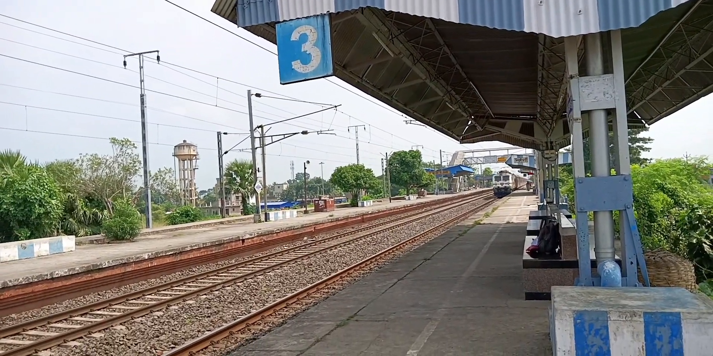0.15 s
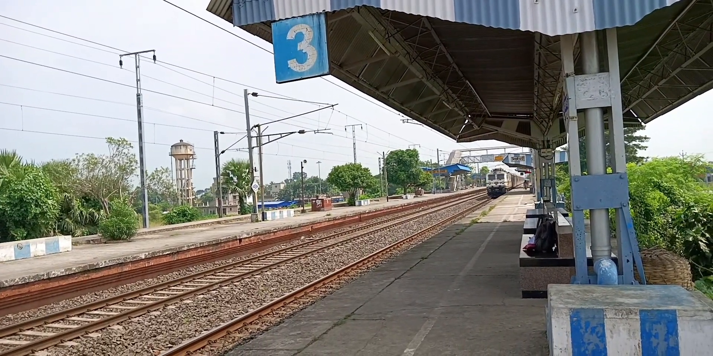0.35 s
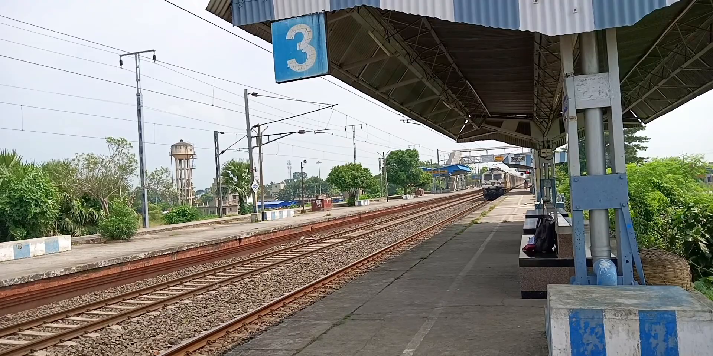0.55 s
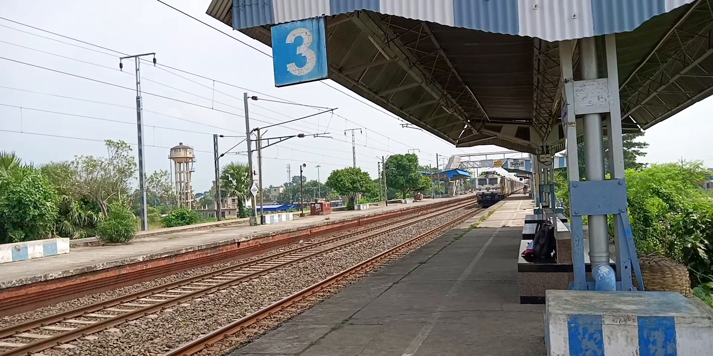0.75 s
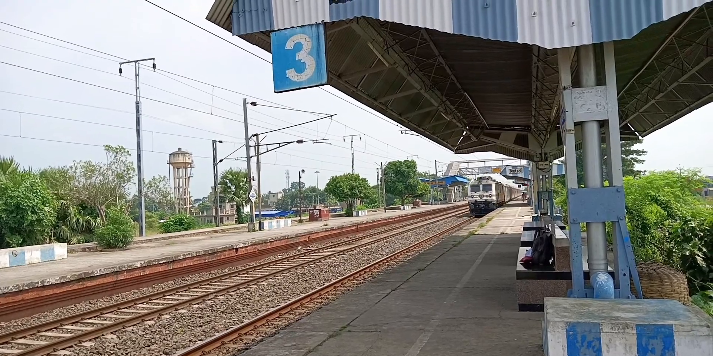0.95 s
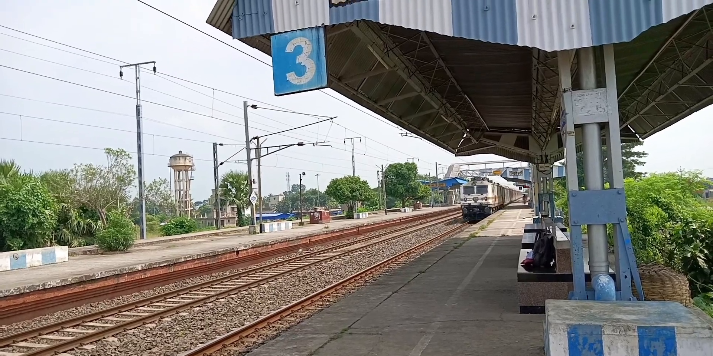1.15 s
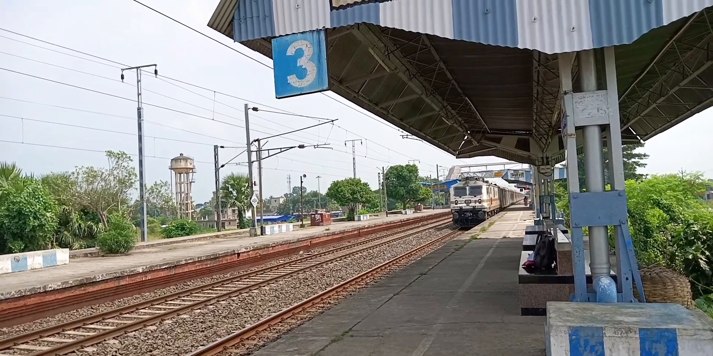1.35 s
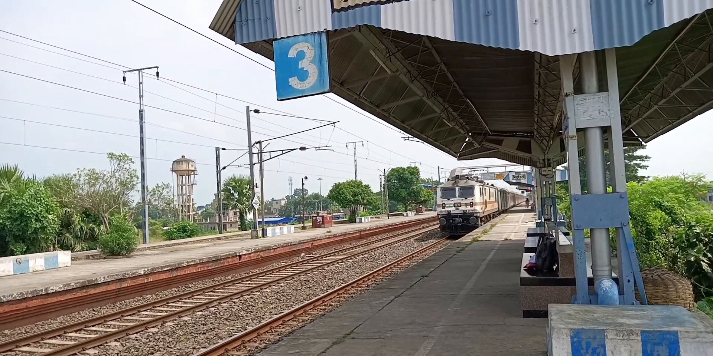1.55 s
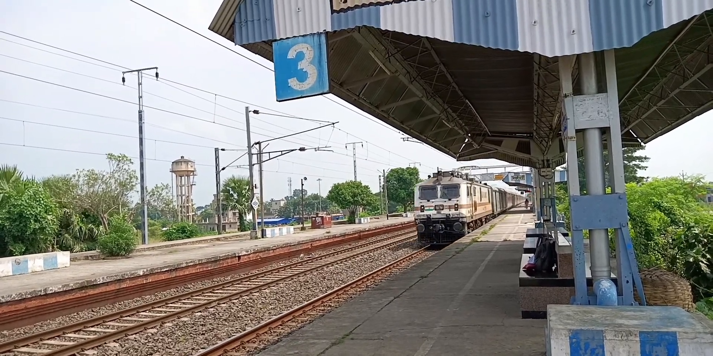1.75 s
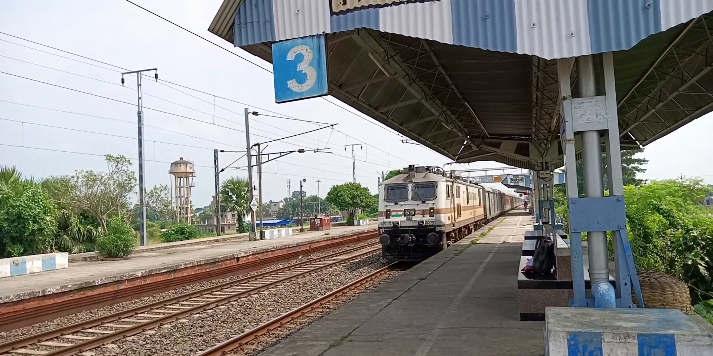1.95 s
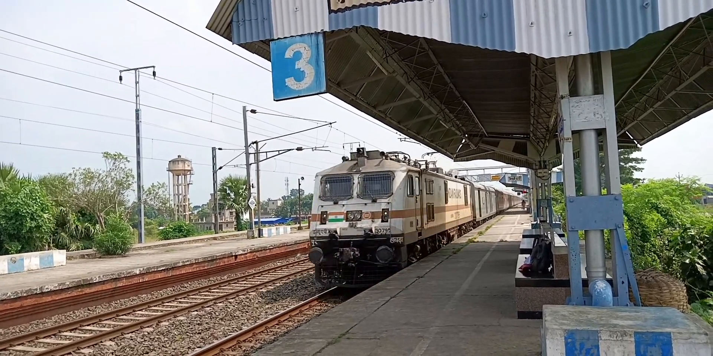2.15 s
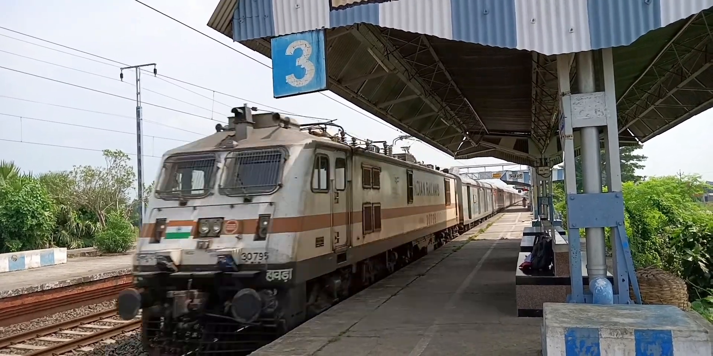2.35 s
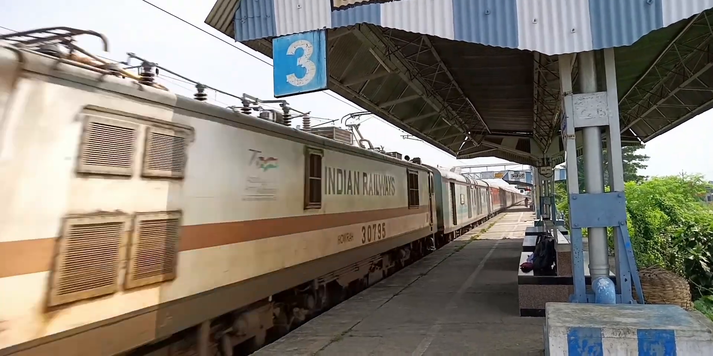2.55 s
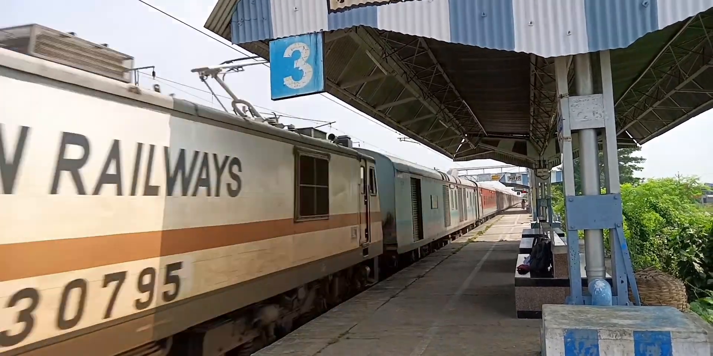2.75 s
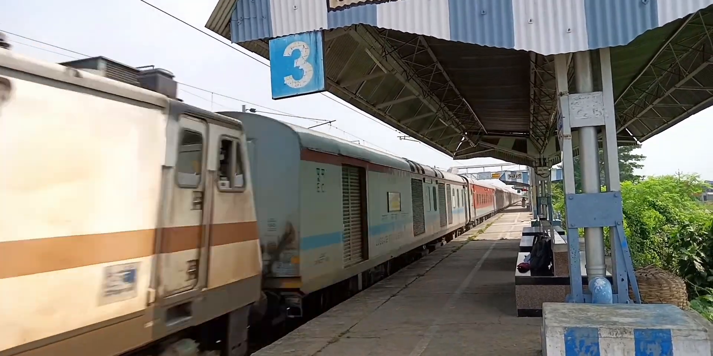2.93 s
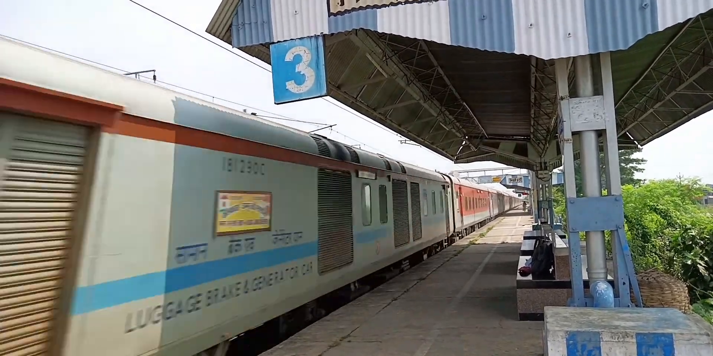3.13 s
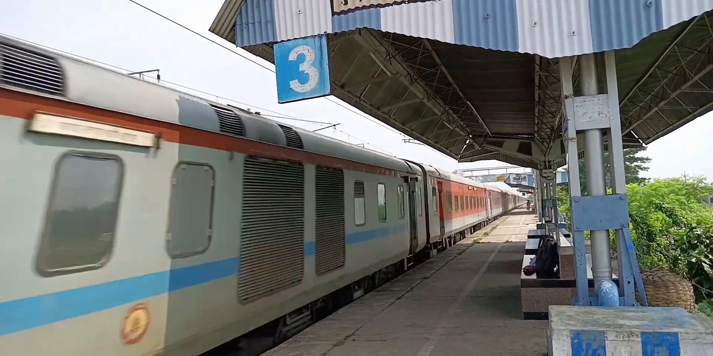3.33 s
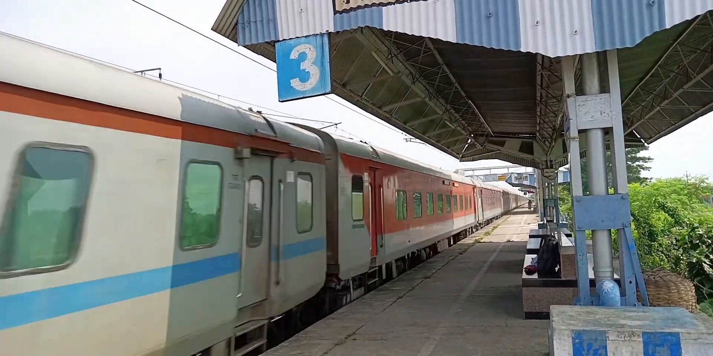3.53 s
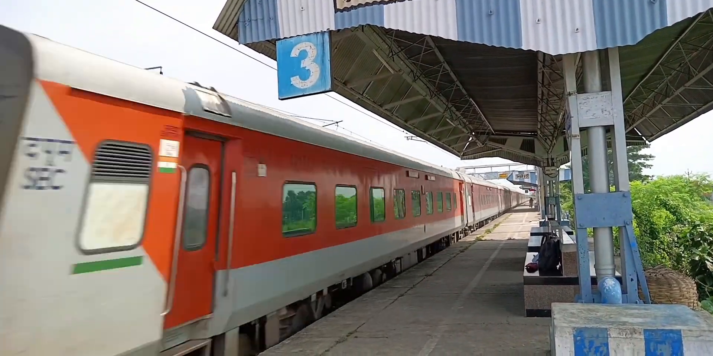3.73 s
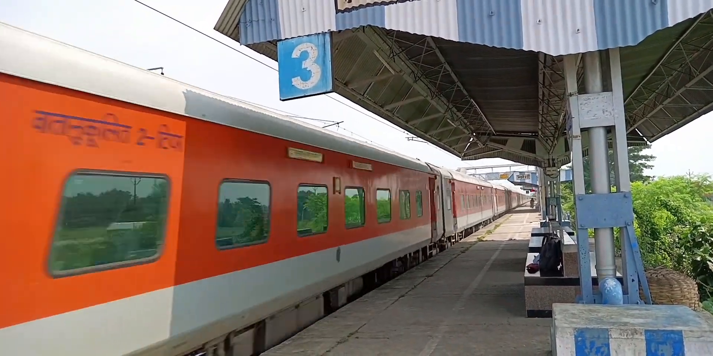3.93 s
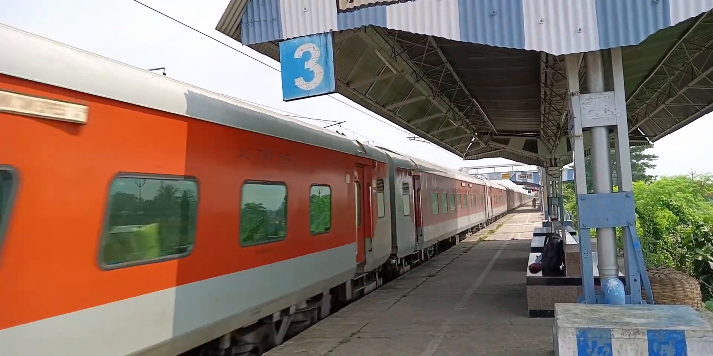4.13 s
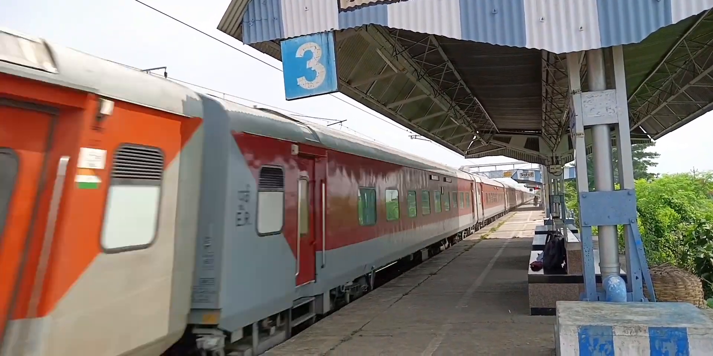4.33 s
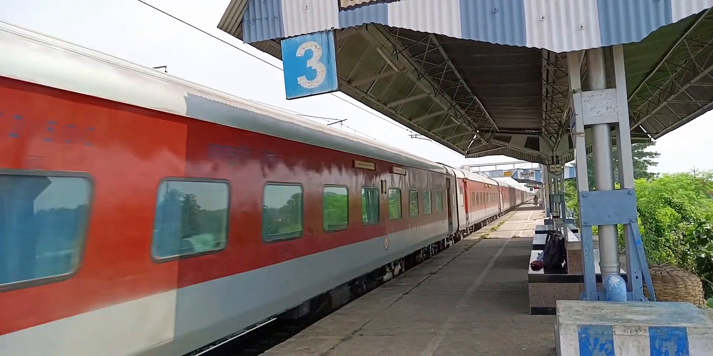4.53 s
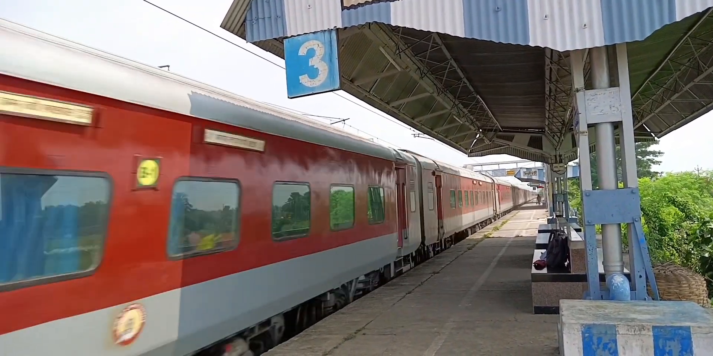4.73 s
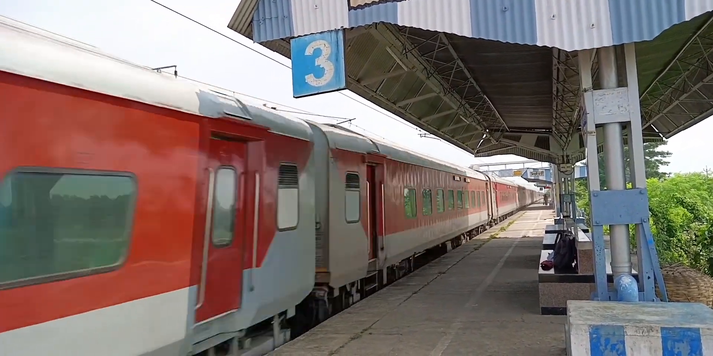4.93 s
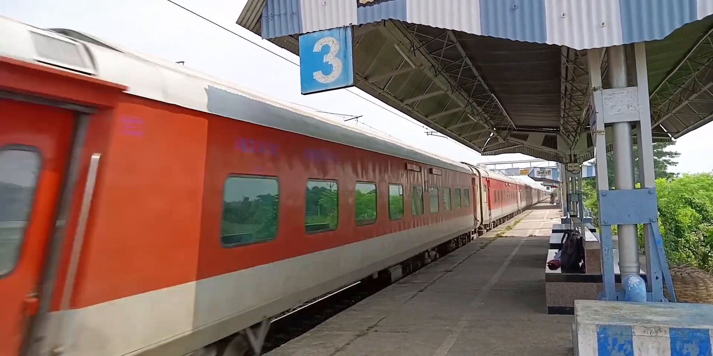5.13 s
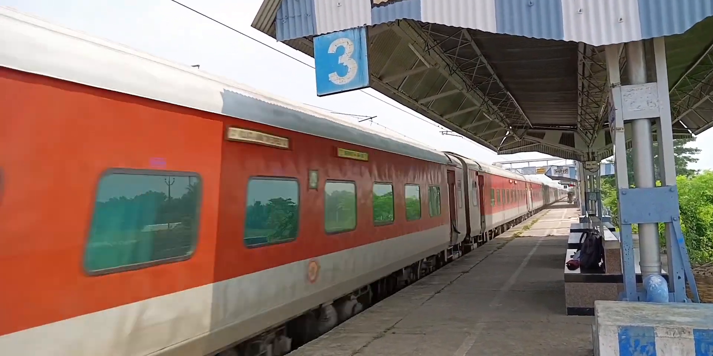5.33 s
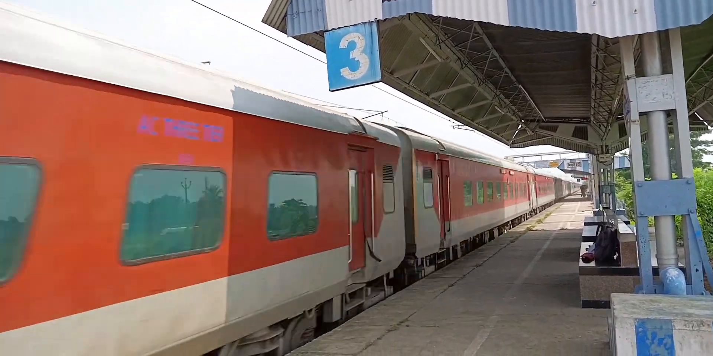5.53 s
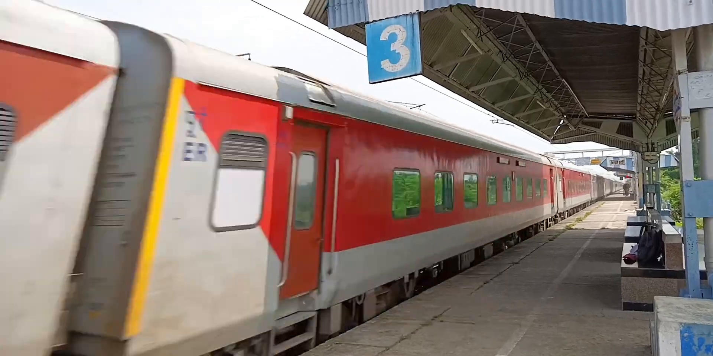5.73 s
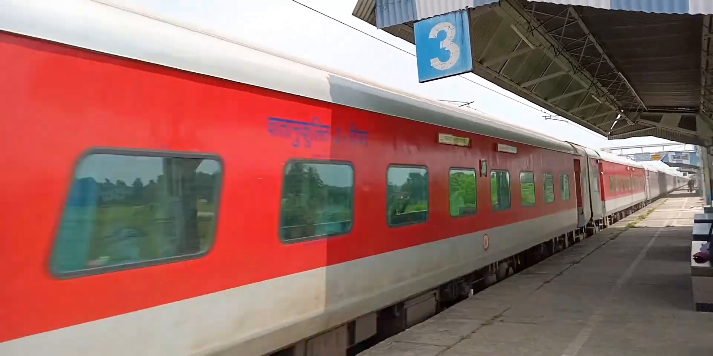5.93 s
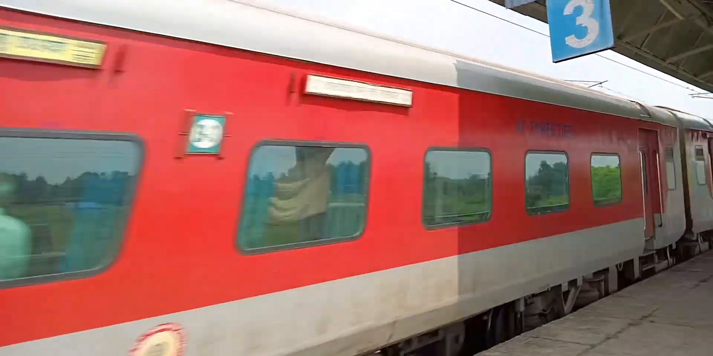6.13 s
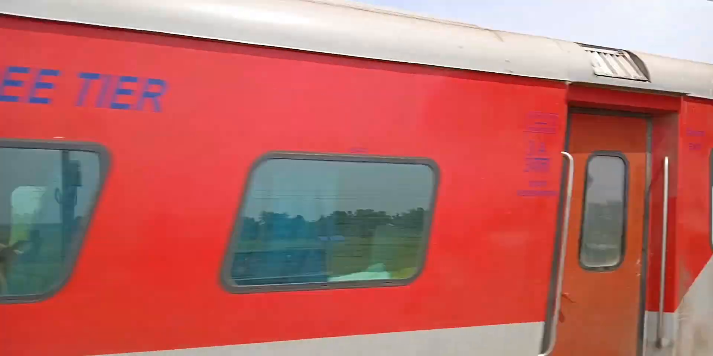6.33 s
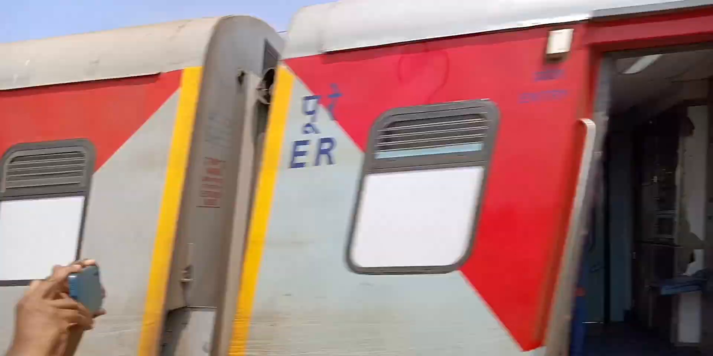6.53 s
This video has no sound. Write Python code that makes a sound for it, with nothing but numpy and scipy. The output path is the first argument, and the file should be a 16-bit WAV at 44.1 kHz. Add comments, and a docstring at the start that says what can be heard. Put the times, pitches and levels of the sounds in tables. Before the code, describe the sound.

From 0 s the rails sing on an open-air platform: a wavering metallic ring around 700 to 1000 Hz, growing over distant rolling. Five faint bird chirps, thin whistles falling at the end, come between 0.3 and 1.05 s. At 1.45 s a brassy single air horn starts, dipping the rail sound beneath it; its tones waver with echoes and short rasps, with a low thump near 2.45 s. The pitch slides down as the locomotive passes around 2.65 s, and the horn stops at 2.76 s. Motor whine, squeals and a big burst of wheel roar peak around 2.7 to 3.1 s. Coaches then rush by very close in throbbing surges of ringing, drone and hiss. Flat wheels hammer about twelve times a second from 3.8 to 4.6 s, with brief squeals, and again sparsely at 5.1 to 5.4 s. Roar ebbs, then swells again, with one blow at 6.55 s, and is still passing at the end.

```python
"""Singing rails and a few bird chirps come first; then a horn drops in pitch as an express train passes close by.
Resonant noise sings in the rails; whistles, whine and horn are tones with pitch glides and blurred echoes.
Swells of roar mix coloured noise and ringing wheel modes, over a steadier bed from the rest of the train.
Flat spots hammer in runs of struck noise; brief high tones and short low thumps come during the horn and the pass."""
import sys
import numpy as np
from scipy import signal
from scipy.fft import rfft, irfft, next_fast_len
from scipy.io import wavfile
from scipy.ndimage import uniform_filter1d, minimum_filter1d

SR = 44100
rng = np.random.default_rng(int(sys.argv[2]) if len(sys.argv) > 2 else 0)


def bounce(signal):
    """Save signal as a 16-bit WAV file at the path given by the first command-line argument."""
    frames = np.transpose(np.atleast_2d(signal))
    limited = np.clip(frames, -1, 1)
    pcm = np.round(limited * 32767).astype(np.int16)
    wavfile.write(sys.argv[1], SR, pcm)


N = 290178

SOUND_M_PER_S, SPEED_M_PER_S, TRACK_DISTANCE_M = 343, 33.5, 4.5


def from_db(db):
    """Decibels to gain."""
    return np.exp(np.asarray(db) * (np.log(10) / 20))


def rms_one(x):
    """Scale to unit power."""
    return x / np.sqrt(np.mean(np.abs(x) ** 2) + 1e-20)


def seconds():
    """Time of every sample."""
    return np.arange(N) / SR


def in_time(rows):
    """Each level column of a table, joined by straight lines over time."""
    s, *columns = np.transpose(rows)
    return [np.interp(seconds(), s, c) for c in columns]


def drift(rate_hz):
    """Slow random wander of spread 1, drawn on a coarse time grid."""
    size = 16384
    hz = np.arange(size // 2 + 1) * SR / N
    spectrum = rfft(rng.standard_normal(size))
    slow = irfft(spectrum / (1 + (hz / rate_hz) ** 2))
    return np.interp(np.arange(N) * size / N, np.arange(size), rms_one(slow))


def noise(colour):
    """Unit-power noise with the given spectrum, falling away steeply beyond its ends."""
    size = next_fast_len(N)
    hz, db = np.transpose(colour)
    log_hz = np.log(np.maximum(np.arange(size // 2 + 1) * SR / size, 1))
    outside = np.abs(log_hz - np.clip(log_hz, np.log(hz[0]), np.log(hz[-1])))
    gain = from_db(np.interp(log_hz, np.log(hz), db)) * np.exp(-4 * outside)
    white = rfft(rng.standard_normal(size))
    return rms_one(irfft(white * gain, size)[:N])


def ringing(modes, flare_db):
    """Resonances shaken by surface roughness, each swelling on its own; unit power."""
    out = np.zeros(N)
    for hz, width_hz, db in modes:
        # two passes keep the valleys dark; the wider filter makes up for their narrowing
        b, a = signal.iirpeak(hz, hz / (1.55 * width_hz), fs=SR)
        shaken = signal.sosfilt([[*b, *a]] * 2, rng.standard_normal(N))
        out += from_db(db + flare_db * drift(5.7)) * shaken
    return rms_one(out)


def swell(at_s, length_s):
    """A smooth rise and fall around one moment."""
    return np.exp(-2 * np.minimum(((seconds() - at_s) / length_s) ** 2, 20))


def passing(t, passes_s, heard_s):
    """Gain at times t of something that goes by and radiates sideways; 1 when abreast."""
    return 1 / (1 + ((t - passes_s) / heard_s) ** 2)


def source_time(passes_s, away_m=TRACK_DISTANCE_M):
    """When the sound now arriving left a point on the train: this gives the Doppler drop."""
    left = np.linspace(-1, N / SR + 1, num=4000)
    distance_m = np.hypot(SPEED_M_PER_S * (left - passes_s), away_m)
    # the shortest path counts as no delay
    arrives = left + (distance_m - TRACK_DISTANCE_M) / SOUND_M_PER_S
    return np.interp(seconds(), arrives, left)


def diffuse_tone(cycles, spread_hz):
    """A tone blurred by many reflections: its strength and phase wander at random."""
    wander = drift(spread_hz) + 1j * drift(spread_hz)
    return np.real(wander * np.exp(2j * np.pi * cycles))


# Short low thumps, some during the horn, some as the train passes: (t/s, level/dB)
LOW_THUMPS = [(2.249, -34.5), (2.41, -42), (2.46, -27), (3.85, -36), (4.05, -40), (4.38, -39), (5.25, -41)]


def low_thumps():
    """Brief swells of dark noise, strongest at the bottom of the spectrum."""
    thumps = sum(from_db(db) * swell(s, 0.018) for s, db in LOW_THUMPS)
    return thumps * noise([(18, -16.5), (45, -6.5), (90, -7.5), (200, -6.5)])


# Bird chirps: (start t/s, length t/s, top f/Hz, level/dB)
BIRD_CHIRPS = [(0.276, 0.052, 4820, -53), (0.493, 0.071, 4600, -44), (0.619, 0.05, 4320, -42.5),
               (0.87, 0.067, 4870, -53), (0.97, 0.084, 4550, -46)]


def bird():
    """Short whistles that climb gently and fall steeply, blurred by the trees."""
    out = np.zeros(N)
    for s, length_s, top_hz, db in BIRD_CHIRPS:
        along = np.clip((seconds() - s) / length_s, 0, 1)
        late = np.maximum(along - .55, 0)
        hz = top_hz * (1 - .3 * (along - .55) ** 2 - 1.1 * late ** 2)
        cycles = np.cumsum(hz) / SR
        whistle = np.sin(2 * np.pi * cycles) + 0.49 * diffuse_tone(cycles, spread_hz=80)
        breath = np.clip(14 * along ** 2 * (1 - along), 0, 1)
        out += from_db(db) * breath * whistle
    return out


HORN_ON_S, HORN_OFF_S = 1.447, 2.76
FAR_DIP_DB, FAR_DIP_S = 12, 0.044   # drop of the distant sound as the horn starts, and how long the drop takes
SINGING_ENDS_S, SINGING_FADE_DB_PER_S = 3.11, 61
# Swell of the rails singing ahead of the train: (t/s, level/dB)
SINGING_LEVEL = [(0.0, -24), (.08, -29.5), (.125, -22.5), (.26, -21), (.38, -18), (.76, -17), (.85, -20.5),
                 (1.02, -16), (1.29, -13.5), (1.44, -11.5)]


def far_level(follows=1):
    """Gain of the sound running ahead: it surges, sinks under the horn and fades once the locomotive is by."""
    t = seconds()
    singing_db, = in_time(SINGING_LEVEL)
    dip_db = FAR_DIP_DB * np.clip((t - HORN_ON_S) / FAR_DIP_S, 0, 1)
    fade_db = SINGING_FADE_DB_PER_S * np.maximum(t - SINGING_ENDS_S, 0)
    return from_db(follows * singing_db - dip_db - fade_db)


HIGH_RING_DB, HIGH_RING_FOLLOWS = -33.5, 0.19   # level; share of the singing's swing
# Resonances of the singing rails: (f/Hz, width f/Hz, level/dB)
RAIL_RESONANCES = [(538, 19, -19.5), (708, 20, 1), (724, 9.3, -3), (793, 22, 5), (867, 157, -8.5),
                   (951, 3.1, -2.5), (1070, 17, -18.5), (1027, 41, -3.5), (1140, 110, -14.5),
                   (1384, 90, -16.5), (1689, 41, -24), (1736, 43, -13), (2354, 38, -25.5),
                   (2845, 110, -29.5), (3310, 63, -31.5)]
# Broad colour of the distant rolling: (f/Hz, level/dB per Hz)
DISTANT_COLOUR = [(40, -42), (100, -25), (170, -46), (320, -17), (500, -12.5), (800, -4), (1200, -13.5),
                  (1550, -20.5), (2400, -23.5), (3100, -40.5), (4600, -42.5), (5100, -51.5), (7200, -44.5),
                  (8000, -54.5), (15000, -57.5)]
# Faint high ring of the rails: (f/Hz, width f/Hz, level/dB)
HIGH_RAIL_RESONANCES = [(1737, 43, -4.5), (2298, 37, 4), (3810, 30, -14), (4030, 54, -16),
                        (4640, 170, -28.5), (5660, 120, -23), (7000, 230, -26.5), (8740, 560, -35)]


def rails():
    """Wheel vibration runs far ahead along the rails and radiates in their pass bands, over a high ring."""
    singing = from_db(-0.5 + 1.8 * drift(26)) * ringing(RAIL_RESONANCES, flare_db=4.0)
    distant = from_db(-7.5) * noise(DISTANT_COLOUR)
    high_gain = from_db(HIGH_RING_DB) * far_level(HIGH_RING_FOLLOWS)
    high_ring = high_gain * ringing(HIGH_RAIL_RESONANCES, flare_db=1.5)
    return far_level() * (singing + distant) + high_ring


MOTOR_PASSES_S, MOTOR_HZ = 2.68, 304
MOTOR_DB, MOTOR_LOUDEST_S, MOTOR_HEARD_S = -29, 2.76, 0.51


def motors(steepness=2.0):
    """The locomotive's whine, probably its motors, slides down by Doppler as it goes by."""
    level = from_db(MOTOR_DB) * passing(seconds(), MOTOR_LOUDEST_S, MOTOR_HEARD_S) ** steepness
    return level * diffuse_tone(MOTOR_HZ * source_time(MOTOR_PASSES_S), spread_hz=7)


# Brief high tones, two faint ones during the horn, then squeals as the wheels pass:
# (middle t/s, length t/s, f/Hz, level/dB)
HIGH_TONES = [(1.622, .08, 2750, -37.5), (1.73, 0.033, 3730, -43), (2.78, 0.21, 2170, -12),
              (2.655, 0.48, 2390, -25), (2.77, 0.24, 1560, -16.5), (3.38, 0.074, 2820, -30),
              (3.784, 0.16, 1760, -21), (3.855, 0.016, 1732, -10), (3.997, 0.039, 1890, -13.5),
              (4.725, 0.11, 1824, -23.5), (4.768, 0.1, 2720, -25), (4.772, .07, 4560, -38),
              (4.819, 0.024, 2110, -15), (5.42, 0.13, 3730, -28), (6.164, 0.044, 1660, -21.5)]


def brief_high_tones(sag_per_s=.13):
    """Blurred tones that flare up and sag in pitch; the squeals come from sideways creep on the rail."""
    out = np.zeros(N)
    for s, length_s, hz, db in HIGH_TONES:
        since = seconds() - s
        cycles = hz * (since - sag_per_s * since ** 2 / 2)
        out += from_db(db) * swell(s, length_s) * diffuse_tone(cycles, spread_hz=51)
    return out


NOSE_PASSES_S, HORN_HZ = 2.645, 379.8
HORN_EDGE_DB, HORN_EDGE_FOLLOWS = -16.5, 0.65   # mean third-partial level; share of its swing the edge takes
HORN_SIDE_ON_S, HORN_BEAM_DB_PER_S = 2.63, 15   # from then on each higher partial loses this much more
# Three strong partials, swelling in turn as the reflections shift:
# (t/s, first level/dB, second level/dB, third level/dB)
HORN_PARTIALS = [(1.51, -23.5, -10.5, -12), (1.6, -25, -22.5, -12.5), (1.69, -20.5, -17.5, -10),
                 (1.81, -27.5, -19.5, -13), (1.865, -27.5, -35.5, -15), (1.935, -20, -12, -11),
                 (2.08, -31.5, -6.5, -13), (2.17, -26, -9.5, -19), (2.27, -15.5, -17.5, -7),
                 (2.4, -11.5, -21, -22.5), (2.48, -14, -9.5, -13), (2.54, -24, -13.5, -21),
                 (2.72, -21.5, -18.5, -29)]
# The brassy edge: (multiple of the fundamental, level/dB against the third partial)
HORN_EDGE = [(4, -16), (5, -21), (6, -31), (7, -44), (8, -38.5), (9, -42.5), (10, -49), (11, -52)]
# Brief rasps on the loudest moments of the horn: (middle t/s, length t/s, level/dB)
HORN_RASPS = [(2.048, 0.0076, -40), (2.075, 0.0093, -34.5), (2.218, 0.012, -34.5), (2.251, 0.016, -29.5),
              (2.454, 0.012, -25.5)]


def horn():
    """One air horn, slightly sharp as the valve opens; echoes keep its higher pitch a little longer."""
    t = seconds()
    age = np.maximum(t - HORN_ON_S, 0)
    settling = 0.00042 * np.exp(-age / 0.036)
    cycles = HORN_HZ * (source_time(NOSE_PASSES_S) - settling) + 0.028 * drift(9.5)
    echo_cycles = HORN_HZ * source_time(NOSE_PASSES_S + .08)   # from along the platform
    valve = np.clip(age / 0.031, 0, 1) * np.clip((HORN_OFF_S - t) / 0.017, 0, 1)

    low_db = in_time(HORN_PARTIALS)
    edge_db = HORN_EDGE_DB + HORN_EDGE_FOLLOWS * (low_db[-1] - HORN_EDGE_DB)
    partials = list(enumerate(low_db, 1))
    partials += [(round(k), edge_db + db + 2.0 * drift(2)) for k, db in HORN_EDGE]
    side_on_s = np.maximum(t - HORN_SIDE_ON_S, 0)
    out = np.zeros(N)
    for k, db in partials:
        # short waves scatter most
        echo_share = np.clip(0.072 + 0.014 * k * k + (0.23 + .2 * k) * swell(2.604, 0.36), 0, 1)
        direct = np.sqrt(2 - 2 * echo_share ** 2) * np.sin(2 * np.pi * k * cycles)
        echo = echo_share * diffuse_tone(k * echo_cycles, spread_hz=9 + 3 * k)
        beam_db = -HORN_BEAM_DB_PER_S * (k - 1) * side_on_s   # high partials are thrown forwards
        out += from_db(db + beam_db) * (direct + echo)

    buzz = rms_one(np.maximum(np.sin(2 * np.pi * cycles), 0) ** 2)   # the rasp comes once a cycle
    rasp = buzz * noise([(2300, -4), (3000, 13.5), (3800, 4.0), (5000, 6.0), (6000, -11.0),
                         (7500, -27.0), (12000, -36.0)])
    rasp_gain = sum(from_db(db) * swell(s, length_s) for s, length_s, db in HORN_RASPS)
    return valve * out + rasp * rasp_gain


# Wheel flats striking the rail: (t/s, level/dB, brightness level/dB)
FLAT_BLOWS = [(3.02, -30, 2.5), (3.762, -32, -10), (3.84, -19.5, -6), (3.886, -17.5, -19),
              (3.968, -14.5, -0.5), (4.037, -10.5, -6.5), (4.120, -15, -8), (4.202, -18.5, -14),
              (4.278, -17.5, -8), (4.352, -13.5, -6), (4.43, -16.5, -2.5), (4.507, -14, -7),
              (4.585, -21, -23), (5.135, -23.5, -6), (5.209, -16, -1.5), (5.249, -22.5, -1),
              (5.385, -25, -16), (6.546, -24.5, -1)]
# Colour of a blow: (f/Hz, level/dB per Hz)
IMPACT_COLOUR = [(60, -54), (250, -12.5), (470, -6), (580, -2), (780, 6.5), (1200, -1.5), (1800, -7),
                 (2300, 0.5), (3000, -7), (4200, -25), (7000, -47)]
# Resonances of a wheel, also heard in the swells of roar: (f/Hz, width f/Hz, level/dB)
WHEEL_RESONANCES = [(1570, 91, -6.5), (1713, 18, -0.5), (1891, 56, -1), (1983, 26, -0.5), (2143, 36, 0.5),
                    (2352, 23, -0.5), (2548, 14, -4.5), (2798, 32, -2), (3222, 53, -5.5), (3467, 21, -8),
                    (3794, 18, -6.5), (4240, 18, -18.5), (4560, 24, -10), (5020, 19, -18),
                    (5780, 90, -19.5), (6560, 49, -33), (6450, 110, -28.5)]
# Colour of the cracks and of the contact hiss: (f/Hz, level/dB per Hz)
CONTACT_COLOUR = [(2200, -12), (3300, 2), (3800, 1.5), (4600, -5), (5300, -9), (7100, -12), (8200, -20),
                  (10000, -30), (12000, -37.5), (13800, -40.5), (14800, -33), (16000, -33)]


def wheel_flats(rise_s=0.0045, scuff_s=0.036, ring_t60=0.13, crack_t60=0.21, spit_t60=.12):
    """Each flat slams down with a bright crack, scuffs along the rail and leaves the wheel ringing."""
    t = seconds()
    force, crunch, spit = np.zeros(N), np.zeros(N), np.zeros(N)
    for s, db, bright_db in FLAT_BLOWS:
        blow = slice(int(s * SR), int(s * SR) + SR // 2)
        age = np.maximum(t[blow] - s, 0)
        contact = from_db(db) * np.minimum(age / rise_s, 1)
        force[blow] += contact * from_db(-60 * np.clip(age - scuff_s, 0, 1) / ring_t60)
        crunch[blow] += contact * from_db(bright_db - 60 * np.clip(age - scuff_s / 2, 0, 1) / crack_t60)
        # the highest treble dies first
        spit[blow] += contact * from_db(bright_db - 60 * np.minimum(age, 1) / spit_t60)
    ring = from_db(-3) * noise(IMPACT_COLOUR) + from_db(-4.5) * ringing(WHEEL_RESONANCES, flare_db=1.5)
    crack = from_db(-9.5) * crunch * noise(CONTACT_COLOUR)
    crack += from_db(-34.5) * spit * noise([(7000, 10), (11000, -6), (16000, -1)])
    return force * ring + from_db(3.7 * drift(230)) * crack


def clatter(per_s=45, size_db=5.5, t60=0.31):
    """Loose gear and rough spots on the rail knock at random; strength of their ringing, unit power."""
    sizes = from_db(size_db * np.minimum(rng.exponential(1, N), 3))
    knocks = (rng.random(N) < per_s / SR) * sizes
    dying = signal.lfilter([1], [1, -from_db(-60 / (t60 * SR))], knocks + 1e-18)
    return rms_one(uniform_filter1d(dying, size=130))   # heavy parts take a few milliseconds to speak


TRAIN_ARRIVES_S, TRAIN_RISE_S = 2.7, .15   # half-way moment and time constant of the rise


def arrived():
    """Rises from 0 to 1 as the train fills the platform."""
    return 1 / (1 + np.exp((TRAIN_ARRIVES_S - seconds()) / TRAIN_RISE_S))


# Swells of roar as wheels go by, read by the next three functions:
# (t/s, wheel ring level/dB, contact hiss level/dB, track drone level/dB, rumble level/dB)
ROAR_SWELLS = [(2.54, -26, -43, -19, -34), (2.74, -12, -27, -19.5, -28.5), (3.04, -11.5, -24.5, -20.5, -33),
               (3.25, -26, -31.5, -19.5, -33), (3.85, -18.5, -30, -22.5, -44.5),
               (4.03, -21, -28, -24, -45.5), (4.451, -19.5, -32, -36, -51.5),
               (4.75, -20.5, -37, -25.5, -46.5), (5.02, -33.5, -46, -30.5, -43.5),
               (5.23, -26.5, -29.5, -21, -27.5), (5.39, -14.5, -30, -37.5, -48),
               (5.95, -21, -33.5, -38, -45), (6.17, -34.5, -41.5, -36, -60), (6.45, -23.5, -56, -20.5, -52),
               (6.68, -19, -36, -15.5, -33)]


def wheel_ring(heard_s=0.22, mismatch=.025):
    """Each swell rings with slightly detuned wheel modes, gliding down as it passes."""
    ring = ringing(WHEEL_RESONANCES, flare_db=5.5)
    out, power = np.zeros(N), np.zeros(N)
    for passes_s, *_ in ROAR_SWELLS:
        near = 1 / (1 + ((seconds() - passes_s) / heard_s) ** 4)
        detune = 1 + mismatch * rng.uniform(-1, 1)
        read = source_time(passes_s) * SR * detune + rng.uniform(0, N)
        out += near * np.interp(read % N, np.arange(N), ring)
        power += near ** 2
    return out / np.sqrt(power)   # evens out the overlaps


def train_level(swell_db, bed_db, far_db, heard_s, lead_s, steepness):
    """Gain of one kind of rolling noise: powers of the swells, the bed and the distant approach add up."""
    coarse = np.linspace(0, N / SR, num=2000)
    powers = []
    for (s, *_), db in zip(ROAR_SWELLS, swell_db):
        gain = from_db(db) * passing(coarse, s - lead_s, heard_s) ** steepness
        powers.append(gain ** 2)
    near = np.interp(seconds(), coarse, sum(powers))
    bed = from_db(bed_db) * arrived()
    far = from_db(far_db) * far_level()
    return np.sqrt(near + bed ** 2 + far ** 2)


# the rest of the train, a steady bed under the swells
BED_WHEELS_DB, BED_HISS_DB, BED_TRACK_DB, BED_RUMBLE_DB = -24.5, -35.5, -29.5, -43
# carried along with the singing
FAR_WHEELS_DB, FAR_HISS_DB, FAR_TRACK_DB, FAR_RUMBLE_DB = -22, -32, -17, -30
GRIT_DB = -11   # crackle in the contact patches, against their smooth hiss
FIZZ_DB = -61   # thin top of the hiss, steady once the train is here
# Colours of the rumble, the track drone and the wheels, each: (f/Hz, level/dB per Hz)
RUMBLE_COLOUR = [(20, -17.5), (45, -18), (75, -3), (115, -2.5), (165, -2), (265, 4.5), (370, 1.5),
                 (490, 4.5), (580, 5), (900, -23)]
DRONE_COLOUR = [(250, -26), (450, -14), (590, -6.5), (700, 3.5), (850, 3.5), (1020, 1), (1150, -8),
                (1500, -12), (2500, -36)]
WHEEL_ROAR_COLOUR = [(700, -40), (1150, -3.5), (1500, -0.5), (1730, 3.5), (2000, -1), (2200, 2),
                     (2450, -2.5), (2750, -5.5), (3050, -12), (3800, -26), (5000, -42.5)]


def rolling():
    """Sleepers drone, wheels ring and contact patches hiss and crackle, throbbing with each wheel turn."""
    _, wheel_db, hiss_db, track_db, rumble_db = np.transpose(ROAR_SWELLS)
    track_gain = train_level(track_db, BED_TRACK_DB, FAR_TRACK_DB,
                             heard_s=.15, lead_s=0.056, steepness=0.75)
    wheel_gain = train_level(wheel_db, BED_WHEELS_DB, FAR_WHEELS_DB,
                             heard_s=.17, lead_s=.005, steepness=1.024)
    hiss_gain = train_level(hiss_db, BED_HISS_DB, FAR_HISS_DB,
                            heard_s=0.2, lead_s=-.01, steepness=1.34)
    rumble_gain = train_level(rumble_db, BED_RUMBLE_DB, FAR_RUMBLE_DB,
                              heard_s=.17, lead_s=0.013, steepness=0.74)

    turn = np.sin(2 * np.pi * 13 * seconds() + 1.2 * drift(2))   # about 13 turns a second
    throb_db = 1.3 * turn + 0.82 * drift(15)
    track = track_gain * from_db(throb_db + 1.8 * drift(22)) * noise(DRONE_COLOUR)

    roar = from_db(-3.5) * noise(WHEEL_ROAR_COLOUR)
    knocks = from_db(-8) * clatter() * noise(WHEEL_ROAR_COLOUR)
    wheels = wheel_gain * from_db(throb_db) * (roar + from_db(-9.0) * wheel_ring() + knocks)

    closeness = hiss_gain / hiss_gain.max()   # grit is heard only close by
    grit = from_db(GRIT_DB) * closeness * clatter(per_s=140, size_db=3.0, t60=.02)
    hiss = hiss_gain * from_db(throb_db) * np.hypot(.9, grit) * noise(CONTACT_COLOUR)
    rumble = rumble_gain * from_db(0.5 + 2.1 * drift(15)) * noise(RUMBLE_COLOUR)
    fizz_noise = noise([(8000, -3.5), (11000, -2.5), (13800, -6.5), (14800, 0), (16000, 0)])
    fizz = from_db(FIZZ_DB) * arrived() * fizz_noise
    return track + wheels + hiss + fizz + rumble


def scene():
    """Everything as heard from one spot on the platform, background first."""
    background = low_thumps() + bird() + rails()
    foreground = motors() + brief_high_tones() + horn() + wheel_flats() + rolling()
    return (background + foreground)[None]


CUTOFF_HZ = 15800


def record(dry):
    """A fast limiter holds the peaks under full scale; a steep low-pass cuts the top."""
    ceiling, size = .9, 133   # size in samples, about 3 ms
    needed = ceiling / np.maximum(np.abs(dry), ceiling)
    gain = uniform_filter1d(minimum_filter1d(needed, size), size)
    # the stop band, 70 dB down, begins 700 Hz above the cutoff
    low_pass = signal.cheby2(16, 70, CUTOFF_HZ + 700, fs=SR, output="sos")
    return signal.sosfilt(low_pass, dry * gain)


dry = scene()
out = record(dry)
bounce(out)
```